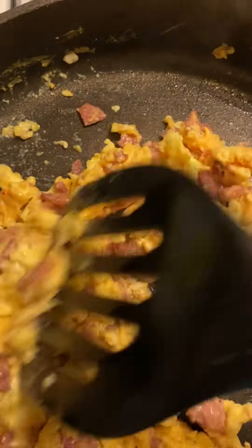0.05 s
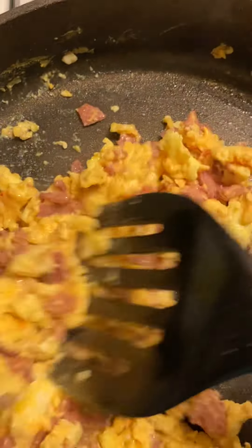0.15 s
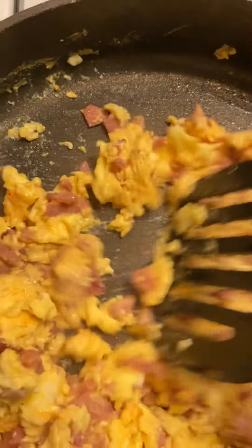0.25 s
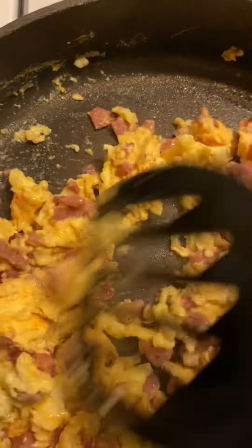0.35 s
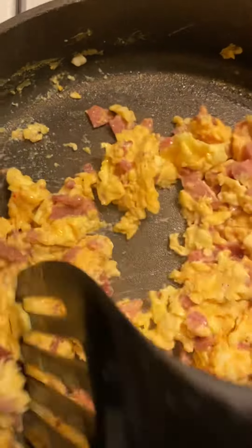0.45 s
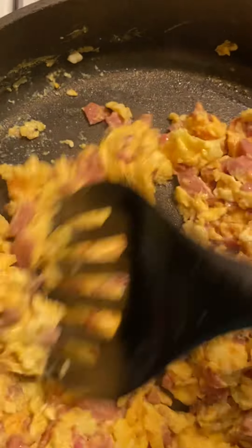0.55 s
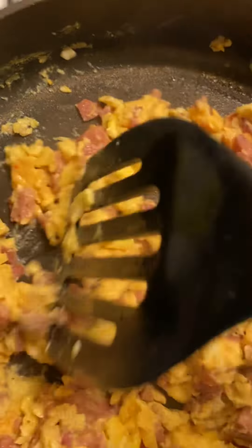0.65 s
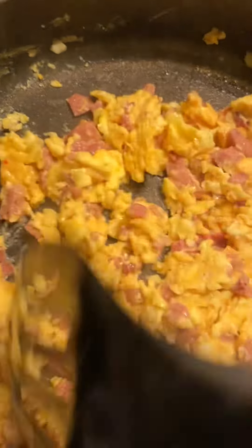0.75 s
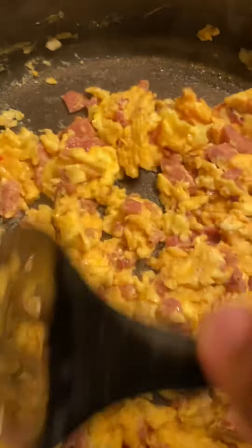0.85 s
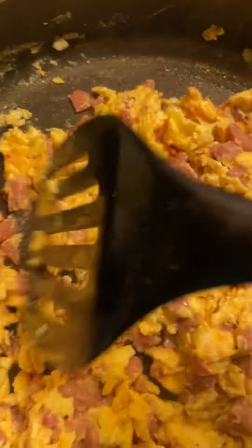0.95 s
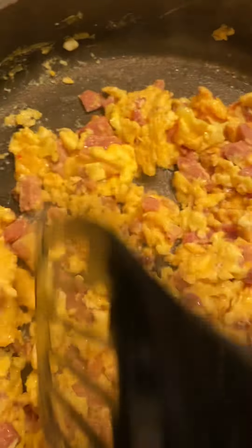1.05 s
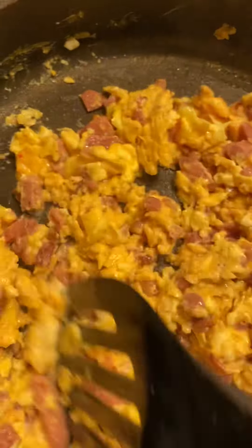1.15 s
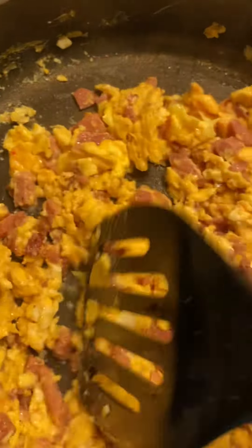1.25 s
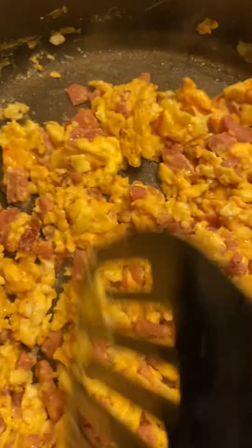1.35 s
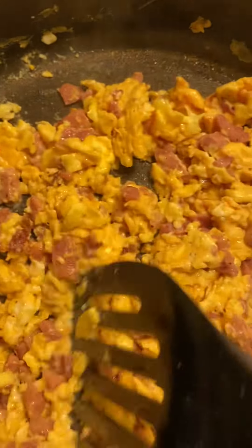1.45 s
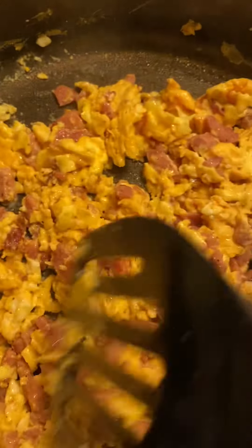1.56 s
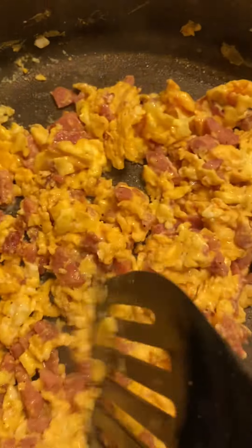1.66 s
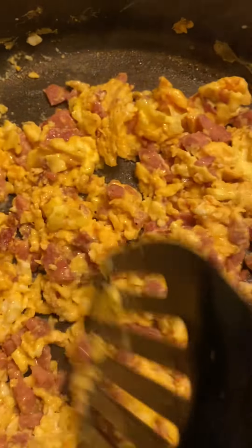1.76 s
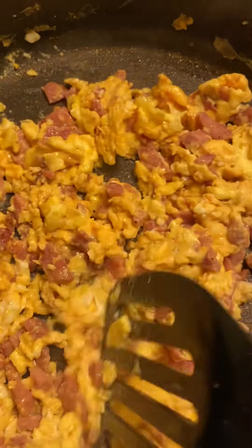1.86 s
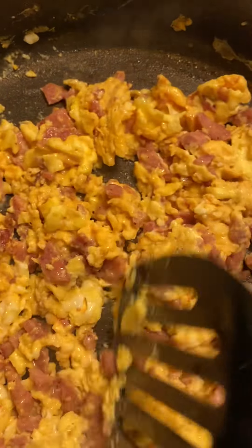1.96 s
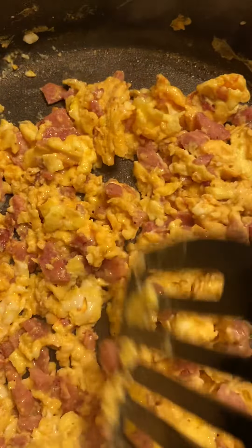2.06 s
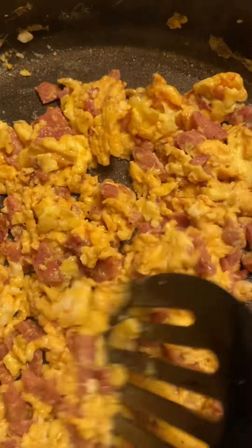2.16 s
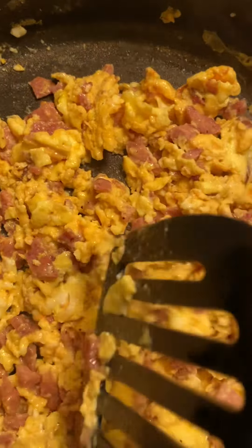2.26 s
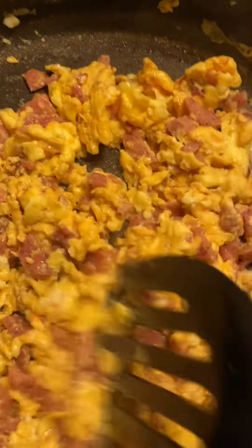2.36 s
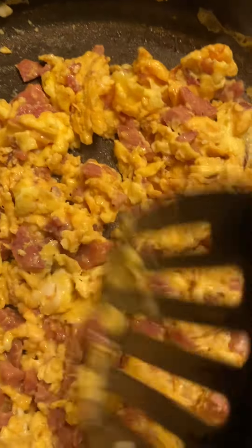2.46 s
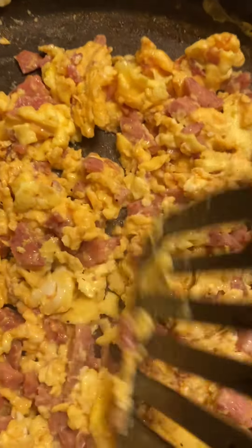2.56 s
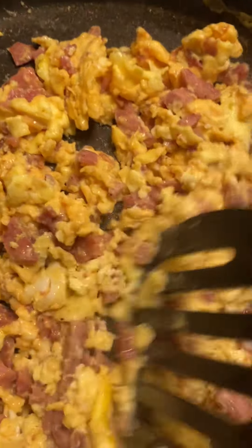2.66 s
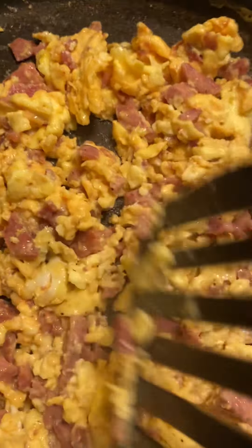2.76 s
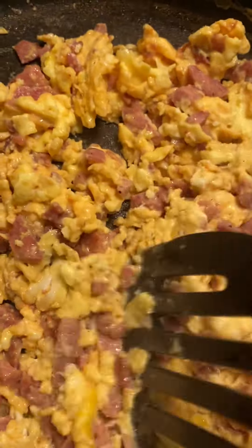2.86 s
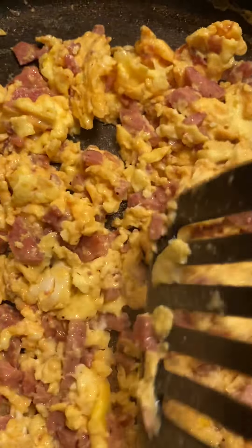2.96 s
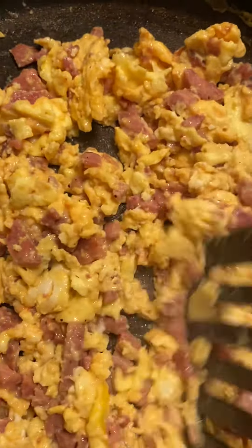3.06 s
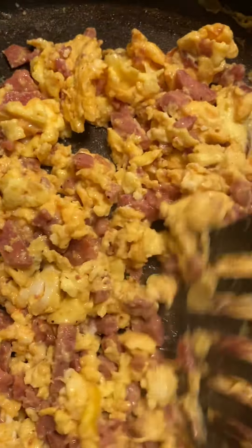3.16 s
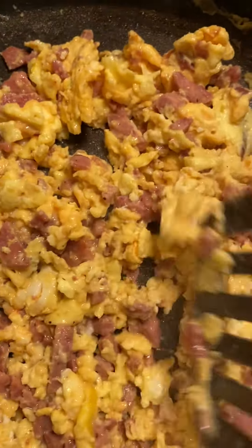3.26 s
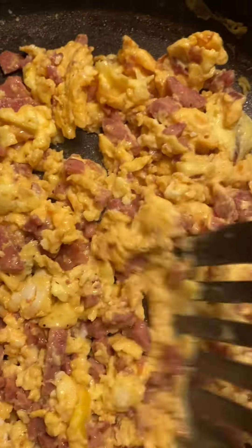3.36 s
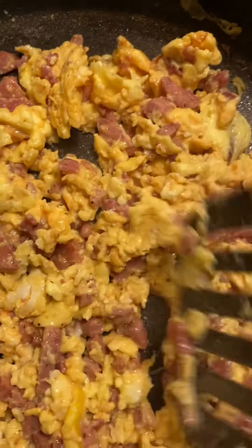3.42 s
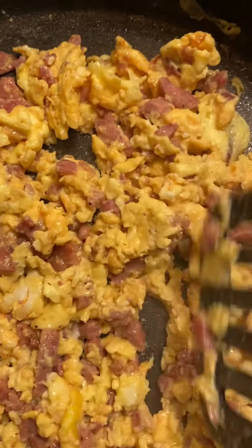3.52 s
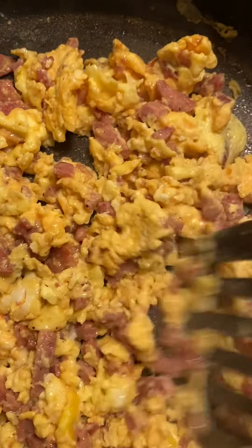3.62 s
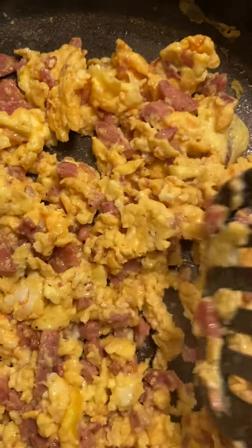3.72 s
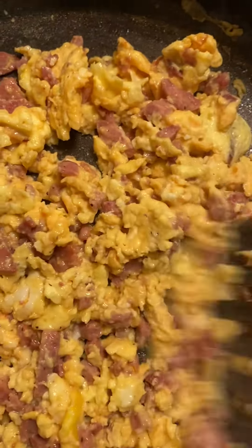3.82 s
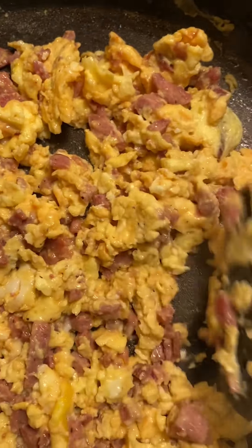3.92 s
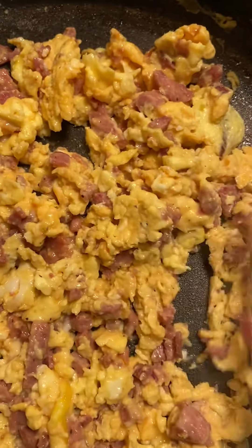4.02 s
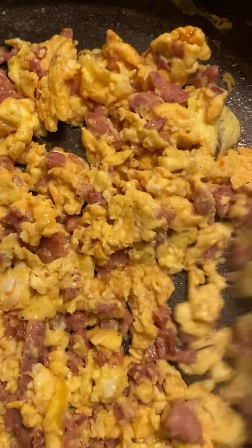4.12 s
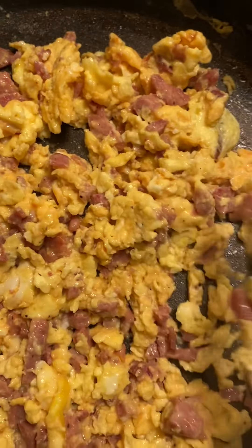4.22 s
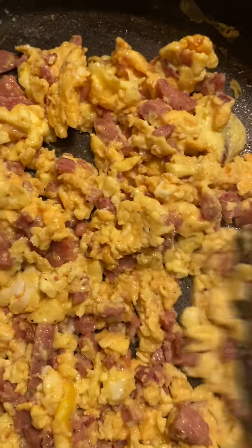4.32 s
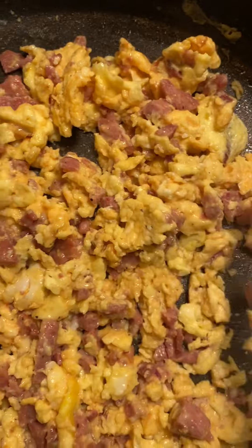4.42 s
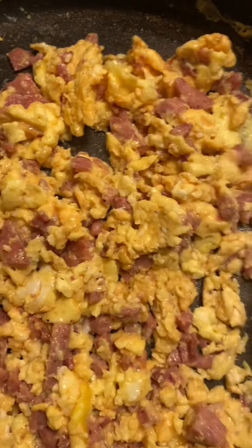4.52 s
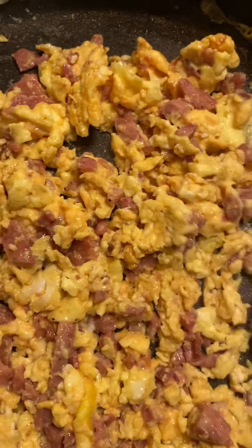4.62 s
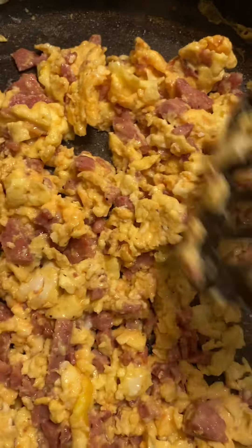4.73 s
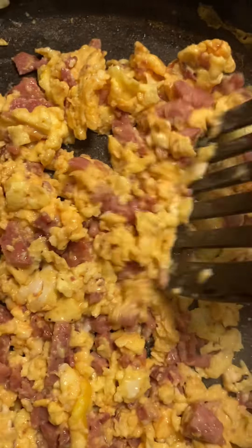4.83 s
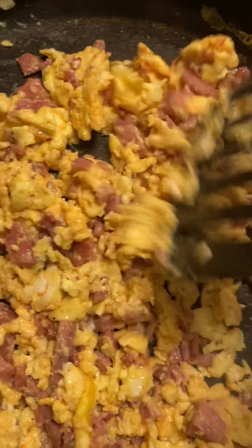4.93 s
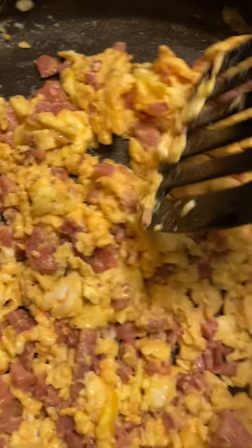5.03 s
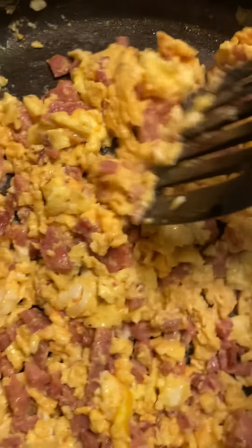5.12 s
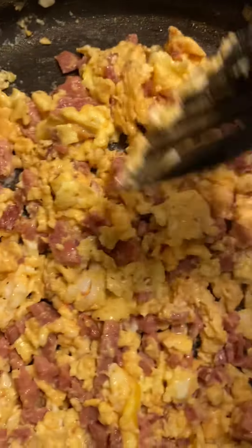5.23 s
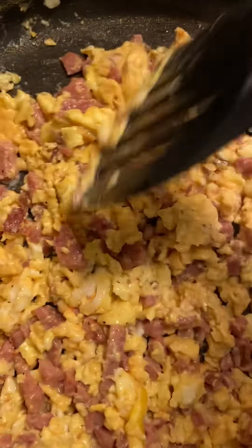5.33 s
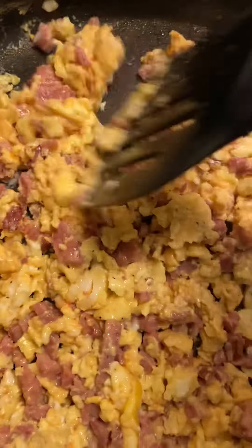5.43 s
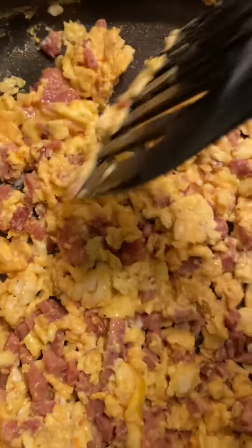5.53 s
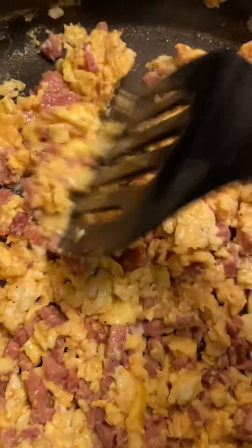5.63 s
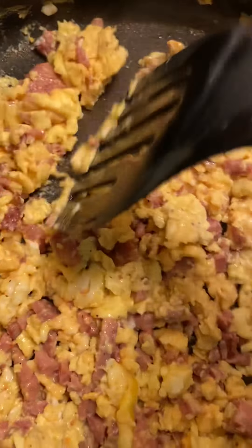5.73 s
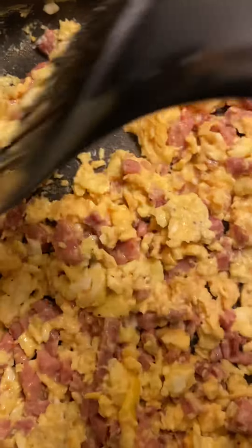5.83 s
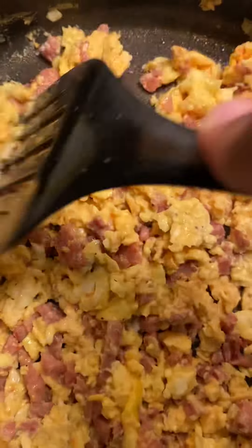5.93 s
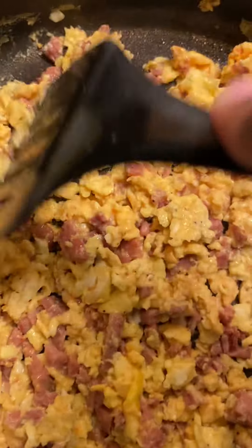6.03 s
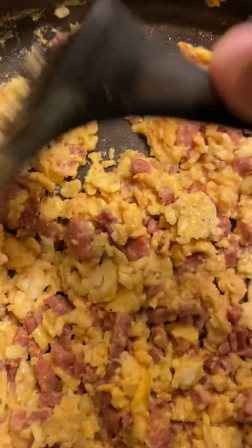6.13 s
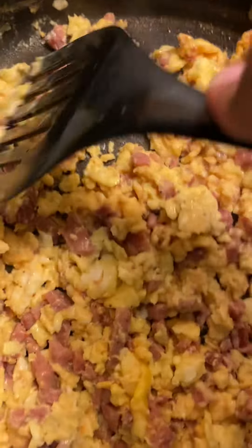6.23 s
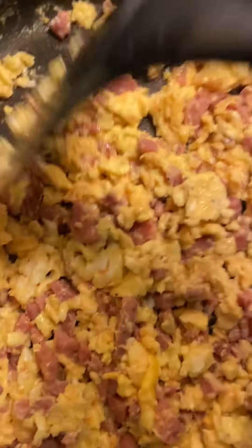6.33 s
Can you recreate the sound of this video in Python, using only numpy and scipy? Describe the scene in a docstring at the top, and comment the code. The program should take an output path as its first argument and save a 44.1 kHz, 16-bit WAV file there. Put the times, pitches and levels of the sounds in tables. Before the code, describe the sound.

Close, dull-ringing spatula knocks against a frying pan, about four a second, with wet scuffs and snaps of food and quiet frying fat.

```python
"""Chopping scrambled egg in a frying pan

A slotted nylon spatula chops egg and diced meat, close to the microphone in a small kitchen.
Each blow is a set of fading pan tones and noise over a low thud; random clicks make the blade scuff
through the food and out of it. Short noise bursts are wet snaps and spits of fat.
Fat sizzles softly all along, as a crowd of tiny clicks, over a low room rumble of filtered noise."""
import sys
import numpy as np
from scipy import signal
from scipy.fft import rfft, irfft, next_fast_len
from scipy.io import wavfile
from scipy.ndimage import uniform_filter1d

SR = 44100
rng = np.random.default_rng(int(sys.argv[2]) if len(sys.argv) > 2 else 0)


def master_out(mix):
    """Clip the mix to full scale and print it as 16-bit PCM to the path in sys.argv[1]."""
    frames = np.transpose(np.atleast_2d(mix))
    ceiling = np.clip(frames, -1, 1)
    pcm = np.round(ceiling * 32767).astype(np.int16)
    wavfile.write(sys.argv[1], SR, pcm)


N = 281349  # length of the scene in samples
RING = SR // 2  # longest single sound in samples
AGE = np.arange(RING) / SR  # seconds since a sound began

# In the tables, t60 is the time a tone or noise takes to fade by 60 dB.
# Frying fat heard alike on both sides. Each row: frequency in Hz, relative level in dB per Hz.
SIZZLE = [(300, 1), (800, -7.5), (1400, -2), (2200, 6.5), (3200, 3.5), (4700, -1.5), (5900, 3.5),
          (7400, -4), (8800, -30), (11000, -52.5), (16000, -45.5)]
# Frying fat heard wide, opposite on the two sides. Each row: frequency in Hz, relative level in dB per Hz.
SIZZLE_WIDE = [(200, -7.5), (500, -2.5), (1000, -6), (1700, -11.5), (3100, -4.5), (4500, -5.5), (6500, -3),
               (8000, -4), (10000, -9.5), (12000, -22.5), (16000, -49)]
# Rise and fall of the sizzle. Each row: time in seconds, level change in dB.
SIZZLE_LEVEL = [(0, -2.5), (.4, -1), (.8, -2.5), (1.4, 1), (2, 1), (2.7, 3), (3.3, 1.5), (3.8, 2),
                (4.55, 1), (5.1, 1), (6.3, 1)]
# Room rumble. Each row: frequency in Hz, relative level in dB per Hz.
RUMBLE = [(20, -20), (38, 2), (55, 7.5), (90, 0), (140, -9.5), (220, -8), (350, -10.5), (600, -18.5),
          (1200, -26.5), (3000, -60)]
# The blade pushed through the food. Each row: loudest moment in seconds, half length in seconds,
# level in dB, treble in dB, centre of the rasp in Hz.
SWEEPS = [(0.093, 0.039, -53, -5, 3000), (0.181, 0.017, -40.5, -6, 1300), (0.202, 0.019, -35, -5.5, 2080),
          (0.434, 0.032, -55, -9, 1700), (0.511, 0.02, -47, 0.5, 3620), (0.559, 0.011, -40.5, -1, 1900),
          (0.782, 0.024, -50, 6.5, 2500), (0.82, 0.017, -31.5, -4, 1400), (.879, 0.024, -49.5, 11.5, 4230),
          (0.901, 0.031, -40.5, -6.5, 1830), (1.144, 0.1, -58, 9.5, 3150), (1.212, 0.011, -39, -5.5, 1250),
          (4.81, 0.013, -47.5, 7.5, 3000), (4.845, 0.025, -59, 16, 2380), (5.363, 0.012, -58, 22, 5060)]
# Food rubbing on the blade. Each row: frequency in Hz, relative level in dB per Hz.
SCUFF = [(100, -26.5), (500, -19.5), (700, 3), (1000, 0.5), (1400, -5.5), (2200, -1.5), (4000, -7.5),
         (7000, -8), (9000, -34), (16000, -51)]
# Wet snaps of food under the blade or as it lifts, and spits of fat.
# Each row: start in seconds, peak level in dB, centre in Hz.
SNAPS = [(.078, -36.5, 2840), (.096, -33, 3320), (.1138, -33.5, 2200), (.154, -31, 8000),
         (.456, -32.5, 1680), (.505, -30.5, 7000), (0.526, -32.5, 3970), (.606, -30, 3440),
         (0.793, -24, 4200), (0.8114, -22.5, 3400), (.870, -46, 4400), (.893, -42, 3000), (.919, -39, 3800),
         (1.413, -29, 2700), (1.419, -30, 6000), (1.4325, -29, 2500), (1.484, -30.5, 1700),
         (1.925, -28, 2920), (2.651, -24.5, 2290), (2.892, -27, 2400), (3.134, -48, 2370),
         (3.371, -38, 2040), (3.626, -36, 2460), (3.870, -33, 1860), (4.712, -36.5, 6640),
         (5.140, -47, 1820), (5.434, -36, 1990), (5.716, -44, 1800)]
# Blows of the blade. Each row: start in seconds, level in dB, pitch of the pan floor in Hz,
# clang of the spot struck in dB, hardness of the contact in dB, boost of the long rings in dB,
# clatter against the ring in dB, thud level in dB.
BLOWS = [(.804, -29.5, 760, 8, -5.5, -0.5, -10, -35.5), (1.156, -36.5, 720, 3, -13, 11, -4.5, -48.5),
         (1.4255, -26, 677, -8.5, -7.5, 27.5, -1, -37), (1.662, -25.5, 666, 0, -1.5, 2, -8.5, -35.5),
         (1.872, -21, 691, -5.5, -3, 5.5, -3.5, -35), (2.114, -22, 723, -7, -6.5, 4, -3.5, -36.5),
         (2.347, -22, 716, -0.5, -1, -3.5, -2.5, -35.5), (2.606, -24.5, 749.7, -2, -1, -13, -3.5, -38),
         (2.822, -14.5, 700, 2, 1.5, -4, -7.5, -29.5), (3.07, -14.5, 743, -1, 1.5, -1, -9, -28.5),
         (3.3143, -18, 732, -2, -2.5, 7.5, -5.5, -33.5), (3.575, -18.5, 719, 1, -2, -4, -7, -31.5),
         (3.818, -18.5, 696, 1.5, -3, -6, -11, -33.5), (4.059, -16.5, 742, 3, 0, 3, -5.5, -27.5),
         (4.306, -15, 727, .5, 0.5, -5, -5.5, -25.5), (4.551, -18, 715, 5.5, 6, -0.5, -5.5, -26),
         (4.834, -42, 686, -14, -3.5, 9, -10, -48), (5.066, -30, 703, 1, 2, 4, -4.5, -36),
         (5.353, -31, 745, 4, 6.5, 4, -6.5, -34), (5.626, -26, 712, 4, 7, 8, -7, -33),
         (6.159, -41.5, 747, 3.5, 10, 10.5, 3, -34.5)]
# The far edge of the blade lands just after the near one. Each row: start in seconds, level in dB.
SECOND_EDGES = [(1.165, -48), (1.434, -39.5), (1.88, -33.5), (2.121, -33.5), (3.332, -30.5), (5.074, -39)]
# The blade comes free and the pan rocks back. Each row: time in seconds, scuff in dB, thump in dB.
LIFTS = [(1.211, -44, -49), (1.479, -39, -45.5), (1.705, -43.5, -53.5), (1.926, -39.5, -45.5),
         (2.168, -41.5, -50.5), (2.406, -38, -48), (2.651, -38.5, -59), (2.891, -34, -41.5),
         (3.131, -34, -43.5), (3.368, -37.5, -49), (3.628, -34.5, -48), (3.873, -36.5, -52),
         (4.120, -35, -54.5), (4.368, -37.5, -37.5), (4.610, -41, -38.5), (4.874, -56, -46),
         (5.138, -47.5, -46.5), (5.435, -46, -41), (5.715, -47, -41), (6.245, -51.5, -44.5)]
# Tones of the pan floor, which shift with the load. Each row: pitch in Hz, level in dB, t60 in seconds.
FLOOR = [(707, 0, 0.035), (793, -4.5, 0.042), (835, -11.5, 0.032), (1052, -17, 0.01)]
# Tones of the whole pan. Each row: pitch in Hz, level in dB, t60 in seconds.
PAN = [(674, -16.5, 0.13), (953, -14.5, 0.024), (1185, -24.5, 0.22), (1322.4, -10.5, 0.09),
       (1381, -9.5, 0.065), (1690, -26, 0.031), (1949, -13.5, 0.057), (2237, -19.5, 0.067),
       (2630, -23, 0.063), (2804, -12, 0.033), (3056, -14, 0.051), (3620, -13.5, 0.05),
       (4530, -13.5, 0.054), (5356, -7.5, 0.05), (5790, -7.5, 0.022), (6380, -14, 0.036),
       (6560, -16, 0.025)]
# Crowd of short-lived tones of blade and pan. Each row: frequency in Hz, level in dB per Hz, t60 in seconds.
CLATTER = [(300, -20.5, .028), (500, -15, 0.033), (743, 6.5, 0.043), (1070, -2, 0.042), (1650, -3.5, 0.031),
           (2200, -2, 0.023), (3400, -11, 0.02), (4100, -11, 0.028), (4900, -15.5, 0.014),
           (5650, -14, 0.024), (7840, -16, 0.025), (9300, -33.5, 0.0067), (16120, -55.5, .015)]
# Tones of the hob and counter under the pan. Each row: pitch in Hz, level in dB, t60 in seconds.
HOB = [(85.3, -3, 0.21), (158.7, -1, 0.27), (204.3, -6, 0.14), (310.5, -5.5, 0.12), (351.6, -12, 0.18),
       (423, -12, 0.27), (477, -6, .14)]
# Dull body of the thud. Each row: frequency in Hz, level in dB per Hz, t60 in seconds.
THUD_BODY = [(41.6, -27, 0.58), (93, -6, 0.22), (167, -1.5, 0.28), (305, -2.5, 0.23), (415, -2, 0.24),
             (650, -5, 0.098), (1500, -46.5, .1)]
# The two microphone ports. Each row: frequency in Hz, lead of the left in radians, left minus right in dB.
PORTS = [(60, 0, 0), (350, -.25, 0), (620, -.65, -2), (720, -.7, -3.3), (830, -1, -5), (950, -.4, -9),
         (1080, .3, -7), (1200, -1.3, -.5), (1335, .9, -2.5), (1450, .6, -3), (1650, 0, -2.5), (1900, 1, 1),
         (2750, .8, -1), (3300, 1.4, -4), (4000, 1.2, 1.5), (5400, 1.6, -1), (6600, 2, .5), (8300, 3.1, 0),
         (16000, 3.1, 0)]
# Kitchen echo. Each row: frequency in Hz, level in dB per Hz, t60 in seconds.
KITCHEN = [(60.1, -3.5, 0.56), (200, 1.5, 0.41), (453, -4, 0.38), (756, -0.5, 0.094), (1400, -9.5, 0.22),
           (4030, -8, 0.14), (7700, 9, 0.026), (15900, -15.5, 0.028)]

FLURRY_DB, SIMMER_DB = 1.78, 0.24  # quick and slow swing of the sizzle
RASP_DB = 4  # height of the resonance in a scuff
FORESCUFF_DB, FORESCUFF_LEAD_S = -30.5, 0.0047  # faint scuff just ahead of a blow: level against the blow, lead
CRUNCH_DB, CRUNCH_LAG_S = -22.5, .02  # food crushed under the landed blade: level against the blow, lag
LIFT_WIDTH_S, LIFT_TREBLE_DB, LIFT_HZ = 0.0091, -3.5, 1630  # scuff as the blade comes free
SPRING_DB, SPRING_LEAD_S, SPRING_ATTACK_S = -3, .005, .004  # pan springing back: level against the scuff
ROCK_HZ, ROCK_PEAK_S = 79.5, 0.013  # slower thump as the pan rocks back: final pitch, time to the peak
SNAP_S = .0009  # a snap's noise falls to about a third in this time
PAN_HZ = 718  # pitch of the pan floor under an average load
BEND_SHARE, BEND_S = .018, .025  # pressure bends each tone at first: typical share of its pitch, settling time
FORETICK_DB, FORETICK_S = -24, 0.0062  # faint tick ahead of a blow: level against the blow, lead
BITE_SHARE, TICK_SHARE = 0.86, 1.27  # how far hardness lifts the upper mids and the treble (dB per dB)
THUMP_DB, HOB_DB, BODY_DB = -4.5, -5, -6.5  # parts of the thud
THUD_ATTACK_S = 0.005
THUMP_START_HZ, THUMP_END_HZ, THUMP_FALL_S, THUMP_PEAK_S = 453.5, 68.5, .0052, 0.0054
HUM_HZ, HUM_T60_S = 248.5, 0.54  # one low tone of the hob hums on after each blow
HUM_DB, HUM_RISE_DB_PER_S = -22, 4.5  # its level against the thud at MIDWAY_S; it grows as the chopping goes on
MIDWAY_S = 2.2
TOP_HZ = 15800  # the recorder cuts everything above


def undb(db):
    """Turn decibels into a gain."""
    return 10 ** (np.asarray(db) / 20)


def unit(x, count=None):
    """Scale a sound so its first count samples have an average (rms) level of 1."""
    return x / np.sqrt(np.mean(x[..., :count] ** 2))


def along(table, hz, column=1):
    """Read a table between its rows, with frequency on a log scale like pitch."""
    rows = np.array(table, float)
    return np.interp(np.log(hz + 1e-3), np.log(rows[:, 0]), rows[:, column])


def colour(x, table):
    """Filter a sound with the gain given by (Hz, dB) points, without any sound ahead of its cause."""
    size = 8192
    gain = undb(along(table, np.fft.rfftfreq(size, 1 / SR)))
    # folding the cepstrum forward in time gives the filter its earliest possible response
    cepstrum = irfft(np.log(gain))
    cepstrum[1:size // 2] *= 2
    cepstrum[size // 2 + 1:] = 0
    response = irfft(np.exp(rfft(cepstrum)))[:size // 2]
    response = response.reshape((1,) * (x.ndim - 1) + (-1,))
    return signal.fftconvolve(x, response, axes=-1)[..., :x.shape[-1]]


def add(out, x, s):
    """Mix x into out from time s in seconds."""
    i = int(s * SR)
    x, i = x[max(-i, 0):], max(i, 0)
    out[i:i + len(x)] += x[:max(len(out) - i, 0)]


def fading(table, count):
    """Noise bursts that die away at each frequency's own rate, as a crowd of damped tones does."""
    hz = np.fft.rfftfreq(RING, 1 / SR)
    noise = rfft(rng.standard_normal((count, RING)))
    out = 0
    for k, (_, _, t60) in enumerate(table):
        # this row's band blends into its neighbours
        share = along([(row[0], j == k) for j, row in enumerate(table)], hz)
        out = out + irfft(noise * share, RING) * undb(-60 * AGE / t60)
    return colour(out, [row[:2] for row in table])


def crackle(shape, rate, spread_db):
    """Random clicks, about rate per second, many small and a few large."""
    sizes = undb(spread_db * np.minimum(rng.exponential(size=shape), 6))
    struck = rng.random(shape) < rate / SR
    return unit(struck * sizes * rng.choice([-1, 1], shape))


def walk(rate):
    """Random drift with a spread of 1, heading for a new value rate times per second."""
    size = int(SR / rate)
    steps = np.repeat(rng.standard_normal(N // size + 1), size)
    return unit(uniform_filter1d(steps, size)[:N])


def frying(spectrum):
    """Tiny steam bubbles burst all over the pan, in uneven flurries."""
    flurries = undb(FLURRY_DB * walk(18) + SIMMER_DB * walk(2.5))
    bubbles = crackle(N, rate=6000, spread_db=1.5) * flurries
    return unit(colour(bubbles, spectrum))


def room_rumble():
    """Steady noise, strongest at low frequencies."""
    return unit(colour(rng.standard_normal(N), RUMBLE))


def grit(count):
    """Crumbs snap one by one under the blade, each ringing at one of seven pitches."""
    out = 0
    for hz in np.geomspace(1000, 5500, 7):
        snaps = crackle(count, rate=200, spread_db=1.5)
        tone = signal.lfilter(*signal.iirpeak(hz, 4, fs=SR), snaps)
        out = out + unit(tone) * hz ** .25
    return unit(out)


def scuff(s, width_s, db, treble_db, rasp_hz):
    """Food sticks and slips under the blade: a swell of clicks that also ring the pan; gives sound and start."""
    t = np.arange(-RING // 3, RING // 3) / SR
    # the slips come in bunches a few milliseconds long
    bunches = undb(2 * unit(uniform_filter1d(rng.standard_normal(len(t)), size=170)))
    slips = crackle(len(t), rate=1800, spread_db=2) * bunches + grit(len(t))
    slips = slips / np.cosh(t / width_s * 1.6)
    pan = signal.fftconvolve(slips, pan_ring(PAN_HZ, 0))[:len(t)]
    rub = unit(colour(slips, SCUFF)) + undb(-4) * unit(pan)
    rub = colour(rub, [(rasp_hz / 1.5, 0), (rasp_hz, RASP_DB), (rasp_hz * 1.5, 0)])
    # a short scuff is as strong at its height as a long one
    swell = unit(rub) * np.sqrt(width_s / (t[-1] - t[0]))
    return colour(swell, [(1200, 0), (3500, treble_db)]) * undb(db), s + t[0]


def stirring():
    """A faint scuff leads each blow; the blade crushes food, scuffs free as the pan rocks back, and sweeps."""
    out = np.zeros(N)
    for s, db, *_ in BLOWS:
        add(out, *scuff(s - FORESCUFF_LEAD_S, width_s=.007, db=db + FORESCUFF_DB, treble_db=6.5, rasp_hz=3000))
        add(out, *scuff(s + CRUNCH_LAG_S, width_s=0.013, db=db + CRUNCH_DB, treble_db=-1, rasp_hz=2700))
    for s, db, thump_db in LIFTS:
        add(out, *scuff(s, LIFT_WIDTH_S, db, LIFT_TREBLE_DB, LIFT_HZ))
        spring = colour(pan_ring(PAN_HZ, 3), [(800, 3.0), (1350, 5.5), (2000, 4.5)])
        spring = spring * (1 - np.exp(-AGE / SPRING_ATTACK_S))
        add(out, unit(spring, count=1600) * undb(db + SPRING_DB), s - SPRING_LEAD_S)
        rock = thump(2 * ROCK_HZ, ROCK_HZ, ROCK_PEAK_S)
        add(out, rock * undb(thump_db), s - ROCK_PEAK_S)
    for row in SWEEPS:
        add(out, *scuff(*row))
    return out


def wet_snaps():
    """Single wet snaps and spits: fast-fading noise around one pitch."""
    out = np.zeros(N)
    for s, db, hz in SNAPS:
        burst = rng.standard_normal(RING) * np.exp(-AGE / SNAP_S)
        peak = [(hz / 3, -24), (hz / 1.8, -10), (hz, 0), (hz * 1.7, -11), (hz * 2, -17), (hz * 4, -48)]
        snap = colour(burst, peak)
        add(out, snap * undb(db) / np.abs(snap).max(), s)
    return out


def ring(modes, scatter_db, detune):
    """Struck tones; each contact point weights and loads them a little differently."""
    out = 0
    for (hz, db, t60), (size, shift, bend) in zip(modes, rng.standard_normal((len(modes), 3))):
        # tones between 600 and 740 Hz all move together with the blow; the sign of the other tones depends on
        # the spot
        sign = 1 if 600 < hz < 740 else rng.choice([-1, 1])
        # the pitch settles as the pressure of the blade eases
        bending = BEND_SHARE * bend * BEND_S * (1 - np.exp(-AGE / BEND_S))
        turns = hz * ((1 + detune * shift) * AGE + bending)
        level = undb(db + scatter_db * size - 60 * AGE / t60)
        out = out + sign * level * np.sin(2 * np.pi * turns)
    return out


def pan_ring(hz, sustain_db):
    """One tap on the pan: the load shifts the floor tones and sets the level of the long rings."""
    floor = [(f * hz / PAN_HZ, db, t60) for f, db, t60 in FLOOR]
    wall = [(f, db + sustain_db * (t60 > .08), t60) for f, db, t60 in PAN]
    taps = ring(floor, scatter_db=1, detune=0.014) + ring(wall, scatter_db=1.84, detune=0.0082)
    # little is radiated below the floor tones
    return colour(taps, [(200, -34.5), (530, -5.0), (675, 12.0), (8000, -8), (11000, -9)])


def tines(x, late_s, late_db, fall_db):
    """The tines of the slotted blade land one after another, the later ones tending to be softer."""
    out = x.copy()
    for k, (when, size) in enumerate(rng.random((6, 2))):
        share = (k + .5 + when) / 6
        add(out, x * (.5 + .5 * size) * undb(late_db - fall_db * share), share * late_s)
    return out


def load(x, depth_db):
    """Food lying on the pan changes the balance of frequencies at every blow."""
    hz = np.geomspace(900, 9000, 24)
    return colour(x, [(700, 0), *zip(hz, depth_db * rng.standard_normal(len(hz)))])


def contact(x, clang_db, hardness_db):
    """The spot struck sets the clang; bare metal sounds brighter than a blow cushioned by egg."""
    bite_db, tick_db = BITE_SHARE * hardness_db, TICK_SHARE * hardness_db
    return colour(x, [(850, 0), (1400, clang_db), (3000, bite_db), (6000, tick_db)])


def thump(start_hz, end_hz, peak_s):
    """A few swings of the pan on its support; the pitch falls quickly."""
    hz = end_hz + (start_hz - end_hz) * np.exp(-AGE / THUMP_FALL_S)
    swings = np.sin(2 * np.pi * np.cumsum(hz) / SR)
    return unit(swings * AGE ** 2 * np.exp(-2 * AGE / peak_s), count=1760)


def hob_thud(s, body):
    """The blow shakes the hob: a falling thump, rattling tones with a dull noise body, and a lasting hum."""
    tones = ring(HOB, scatter_db=2.0, detune=0.012)
    rattle = undb(HOB_DB) * unit(tones, count=1760) + undb(BODY_DB) * unit(body, count=1760)
    rattle = rattle * (1 - np.exp(-AGE / THUD_ATTACK_S))
    hum_level = undb(HUM_DB + HUM_RISE_DB_PER_S * (s - MIDWAY_S) - 60 * AGE / HUM_T60_S)
    hum = np.sin(2 * np.pi * HUM_HZ * AGE) * hum_level
    return undb(THUMP_DB) * thump(THUMP_START_HZ, THUMP_END_HZ, THUMP_PEAK_S) + rattle + hum


def chops():
    """The blade lands: the pan rings, the tines clatter, the hob thuds; a faint tick comes just ahead."""
    out = np.zeros(N)
    cracks, bodies = fading(CLATTER, count=len(BLOWS)), fading(THUD_BODY, count=len(BLOWS))
    for row, crack, body in zip(BLOWS, cracks, bodies):
        s, db, hz, clang_db, hardness_db, sustain_db, clatter_db, thud_db = row
        knock = tines(pan_ring(hz, sustain_db), late_s=0.016, late_db=-21.5, fall_db=1.5)
        clatter = tines(crack, late_s=.032, late_db=-7, fall_db=19)
        blow = unit(knock, count=1600) + undb(clatter_db) * unit(clatter, count=1600)
        blow = contact(load(blow, depth_db=1.5), clang_db, hardness_db) * undb(db)
        add(out, blow, s)
        add(out, blow * undb(FORETICK_DB), s - FORETICK_S)
        add(out, hob_thud(s, body) * undb(thud_db), s)
    for (s, db), crack in zip(SECOND_EDGES, fading(CLATTER, count=len(SECOND_EDGES))):
        edge = colour(crack, [(1400, 2.5), (4000, -14.5)])
        add(out, unit(edge, count=1600) * undb(db), s)
    return out


def ports(x):
    """A close source reaches the two microphone ports with different phase and level."""
    size = next_fast_len(N)
    hz = np.fft.rfftfreq(size, 1 / SR)
    # each side takes half of the difference
    half = np.exp(.5j * along(PORTS, hz)) * undb(along(PORTS, hz, column=2) / 2)
    return irfft(rfft(x, size) * np.array([half, 1 / half]), size)[:, :N]


def kitchen(x):
    """Near walls answer within milliseconds; the bass lingers and is alike on both sides."""
    mid, side = fading(KITCHEN, count=2) * (1 - np.exp(-(AGE / 0.005) ** 2))
    side = colour(side, [(100, -40.5), (350, -13.0), (900, -1.5), (2000, 2.5)])
    echo = np.array([mid + side, mid - side]) / np.sqrt(np.sum(mid ** 2))
    return signal.fftconvolve(x[None], echo, axes=1)[:, :N]


def scene():
    """Spatula heard directly and through the kitchen echo, with sizzle and rumble all along."""
    spatula = chops() + stirring() + wet_snaps()
    alike = undb(-57.0) * frying(SIZZLE)
    wide = undb(-55) * frying(SIZZLE_WIDE) * np.array([[1], [-1]])
    sizzle_db = np.interp(np.arange(N) / SR, *np.transpose(SIZZLE_LEVEL))
    sizzle = (alike + wide) * undb(sizzle_db)
    rumble = undb(-49.5) * room_rumble()
    return ports(spatula) + undb(-18.0) * kitchen(spatula) + sizzle + rumble


def record(dry):
    """The recorder rounds the highest peaks and cuts the top of the treble."""
    rounded = np.tanh(0.75 * dry) / 0.78
    lowpass = signal.ellip(8, .2, 70, TOP_HZ, fs=SR, output="sos")
    return signal.sosfilt(lowpass, rounded)


dry = scene()
out = record(dry)
master_out(out)
```